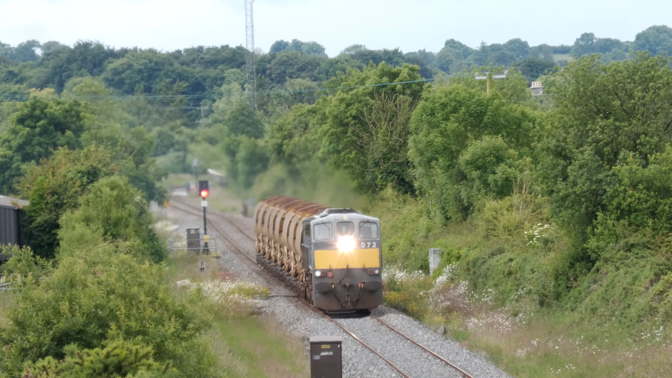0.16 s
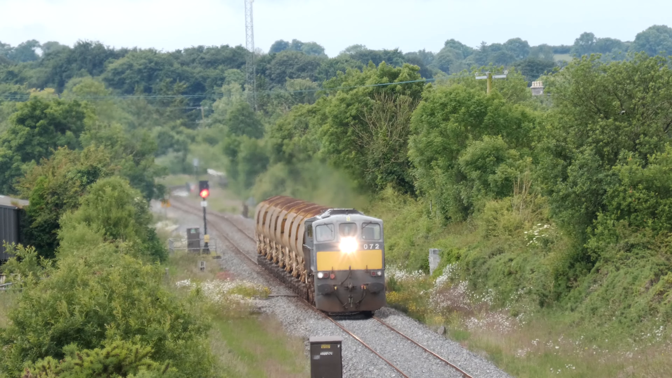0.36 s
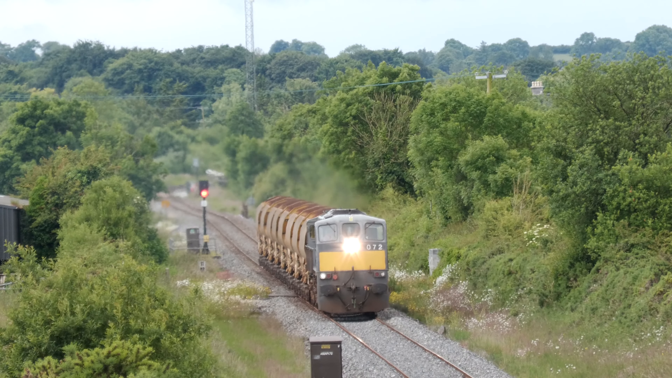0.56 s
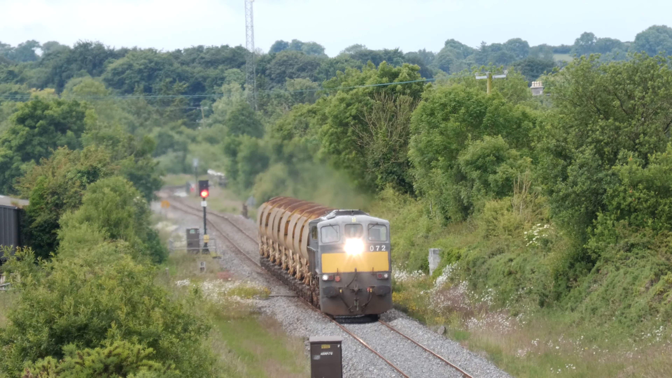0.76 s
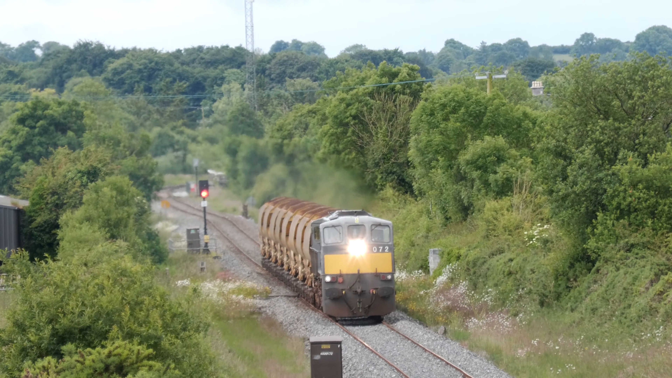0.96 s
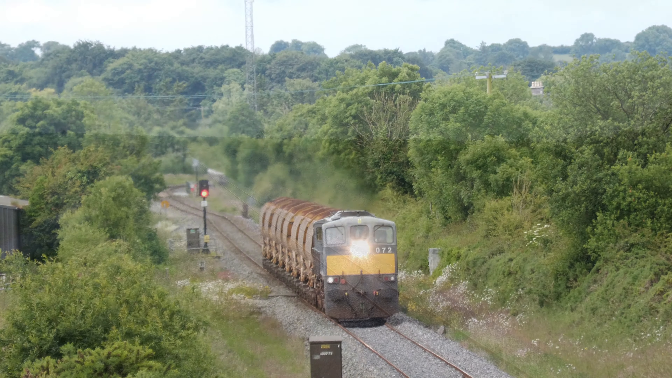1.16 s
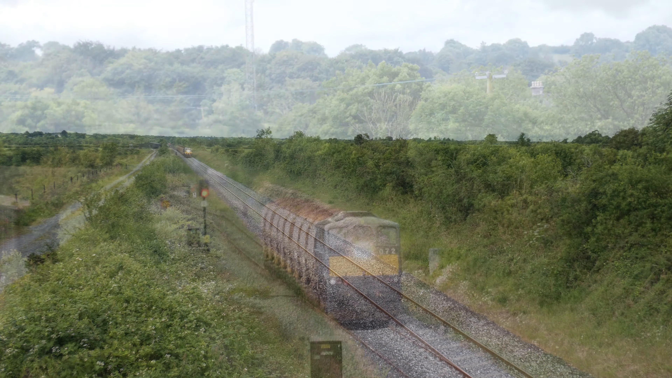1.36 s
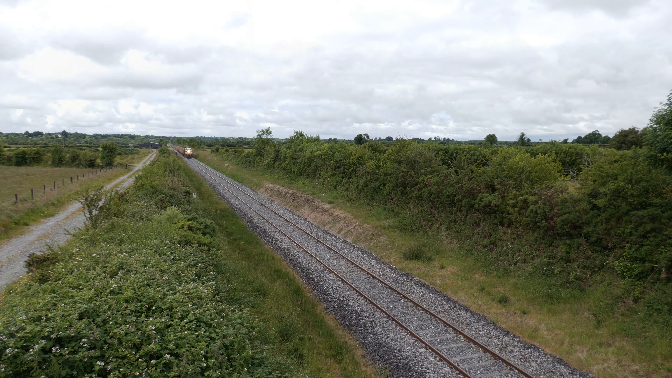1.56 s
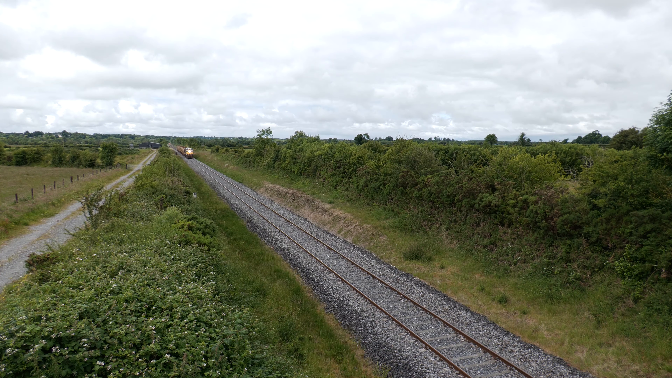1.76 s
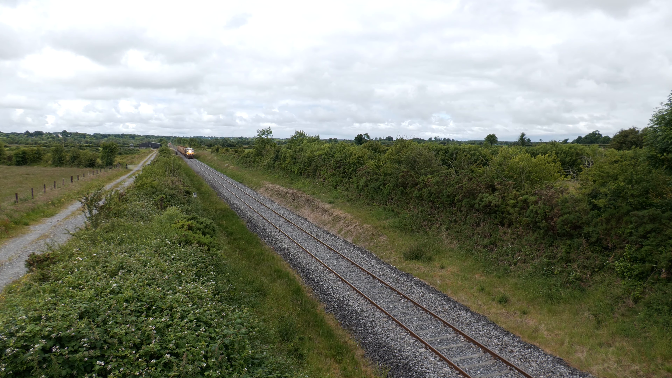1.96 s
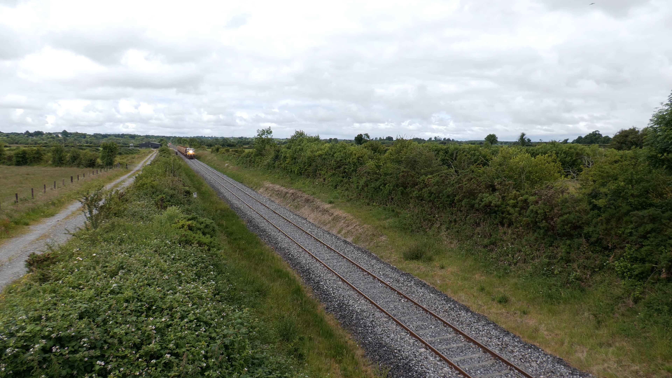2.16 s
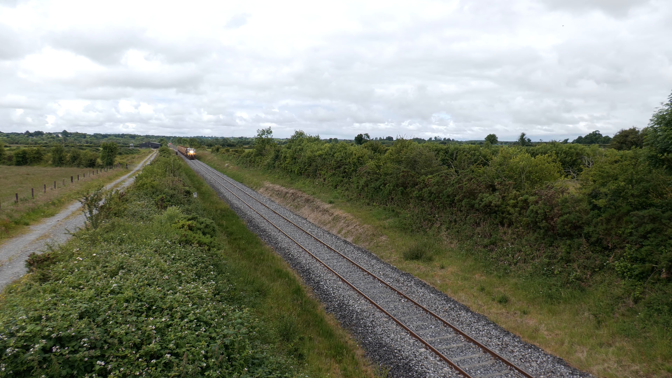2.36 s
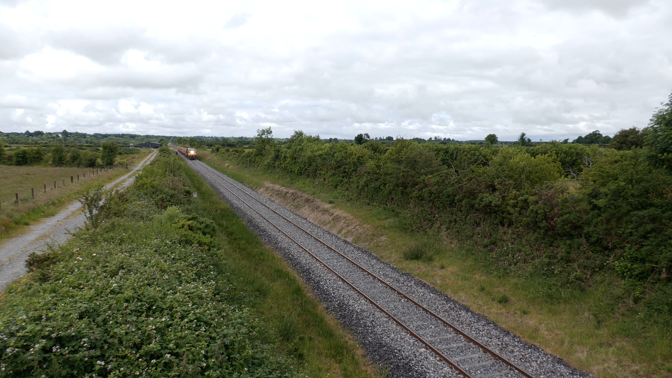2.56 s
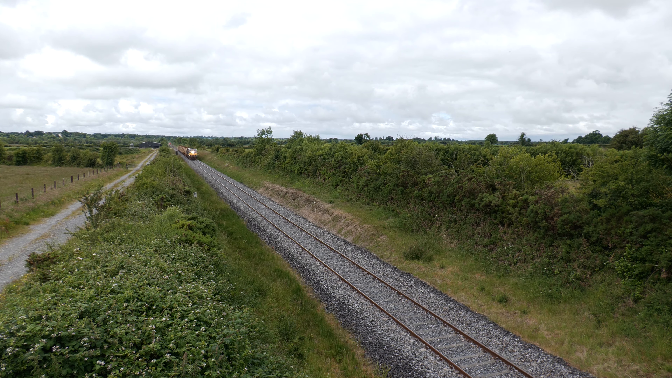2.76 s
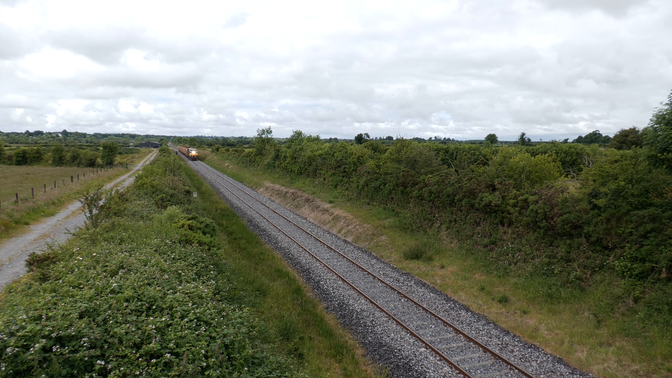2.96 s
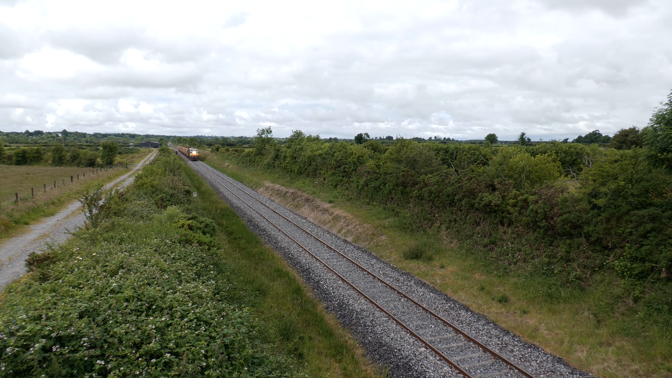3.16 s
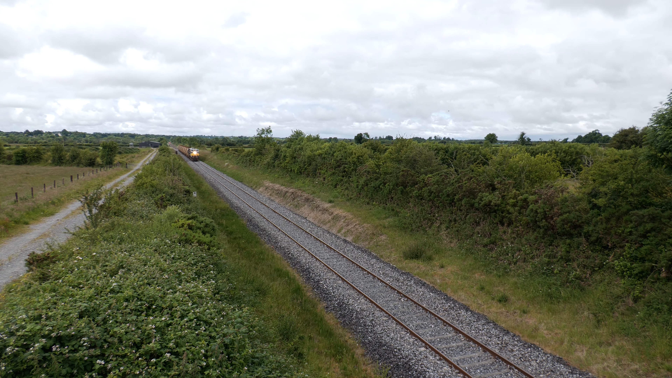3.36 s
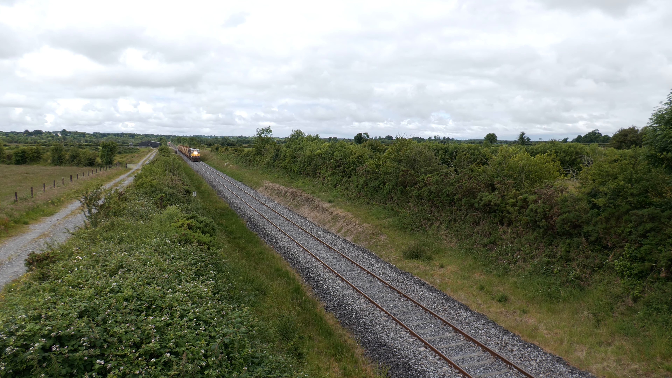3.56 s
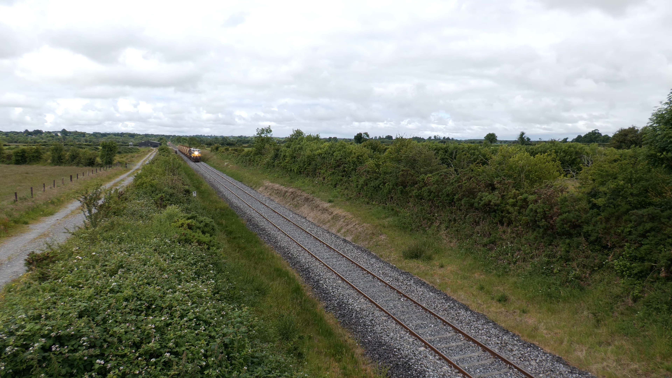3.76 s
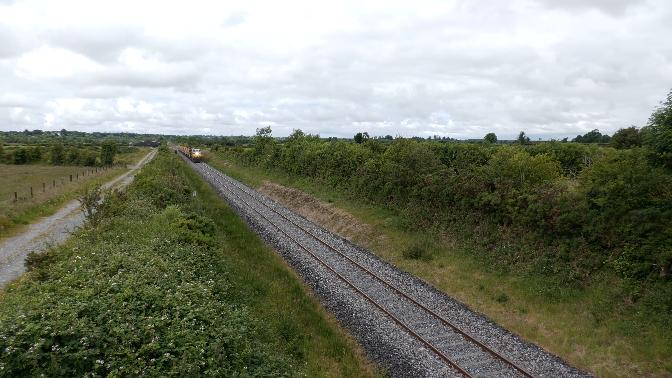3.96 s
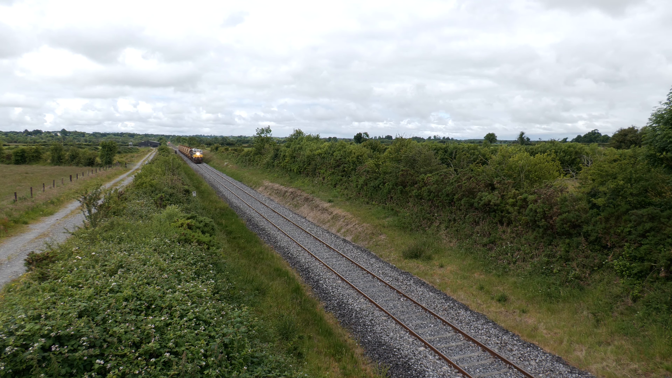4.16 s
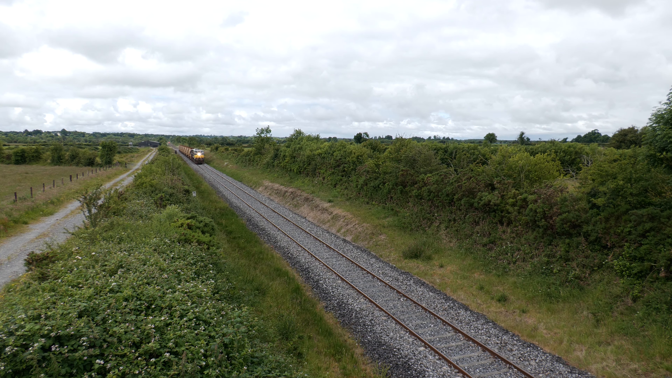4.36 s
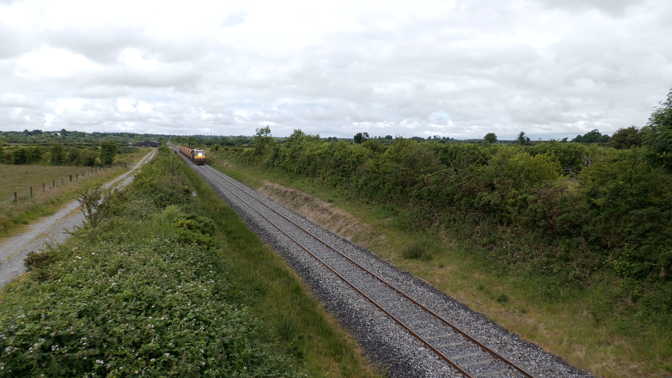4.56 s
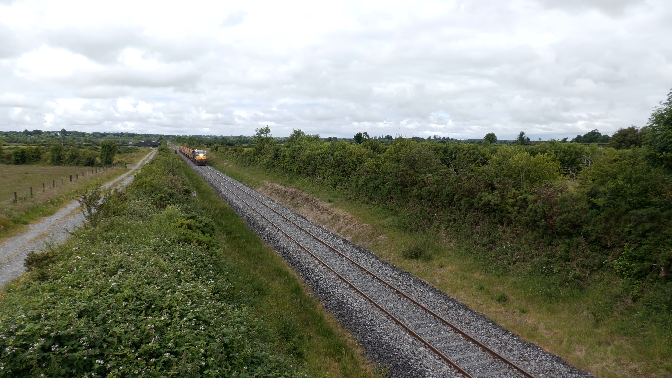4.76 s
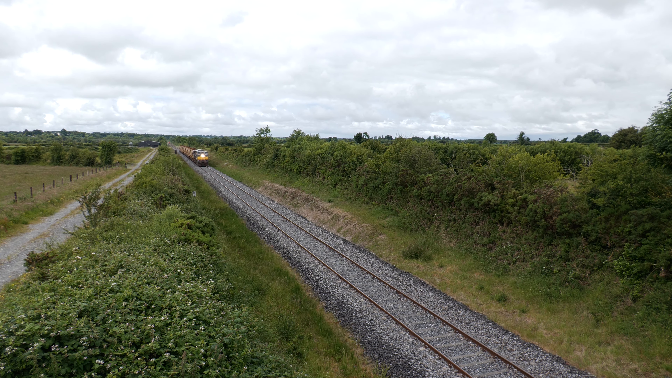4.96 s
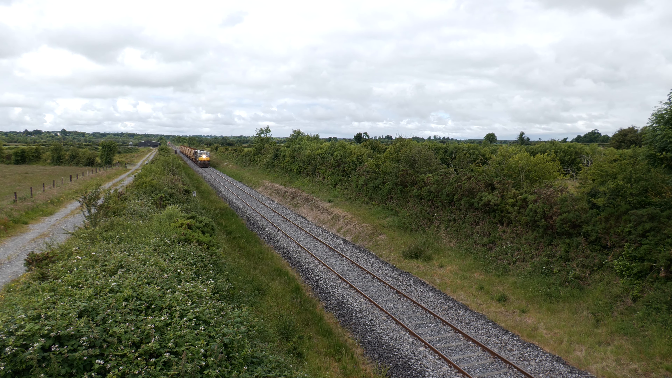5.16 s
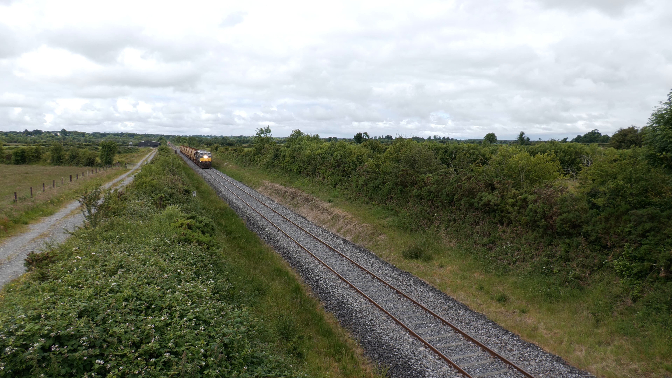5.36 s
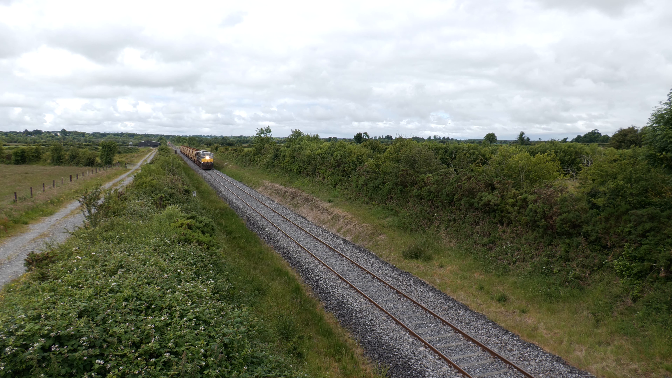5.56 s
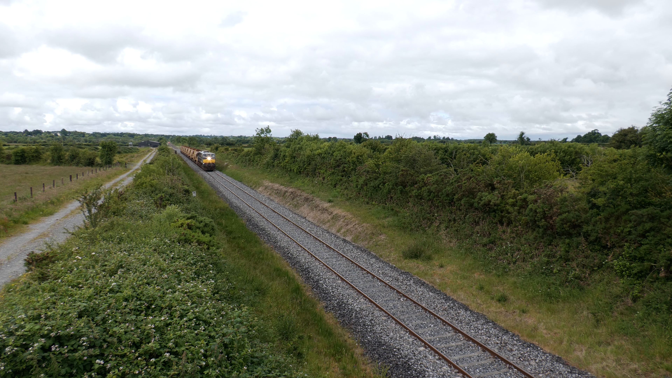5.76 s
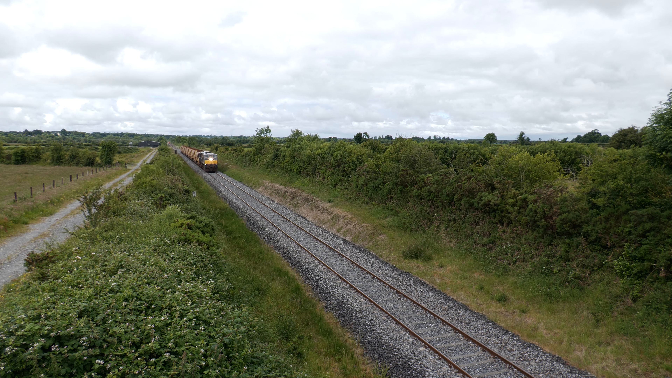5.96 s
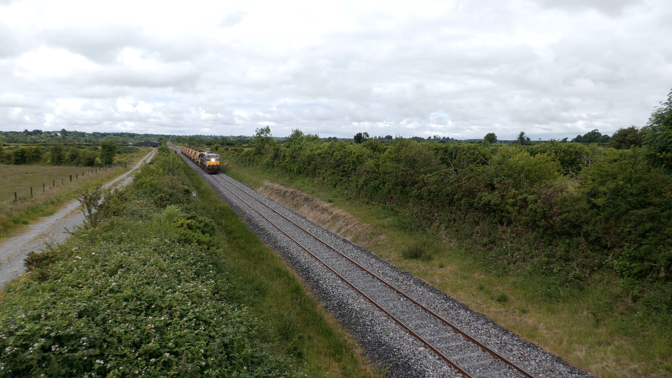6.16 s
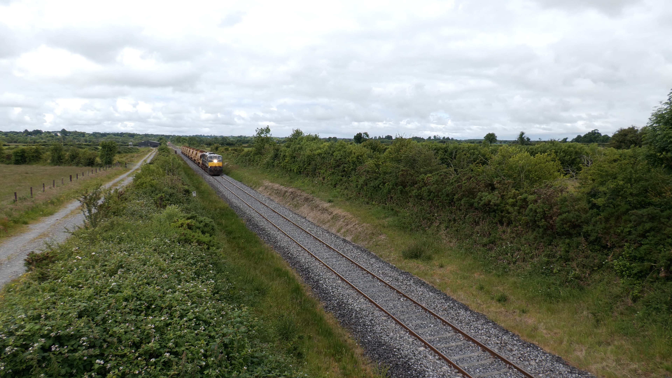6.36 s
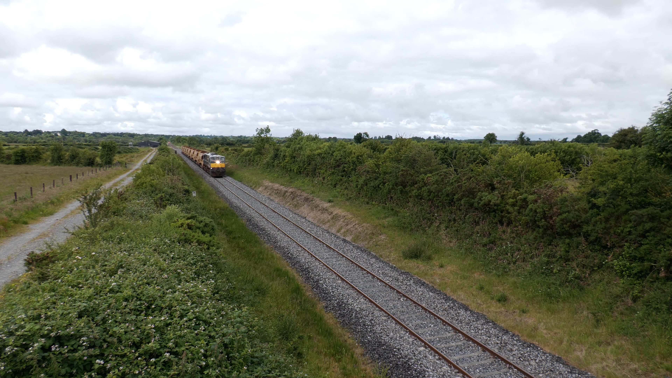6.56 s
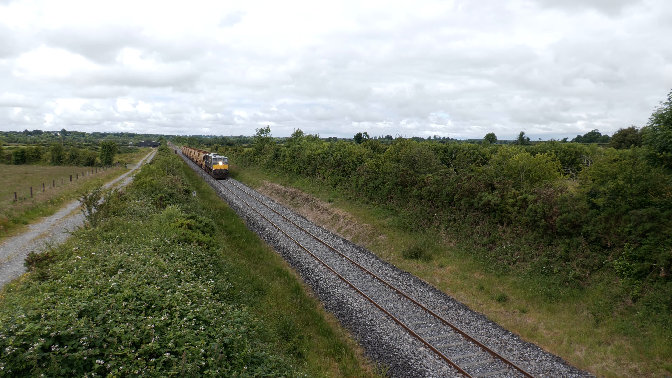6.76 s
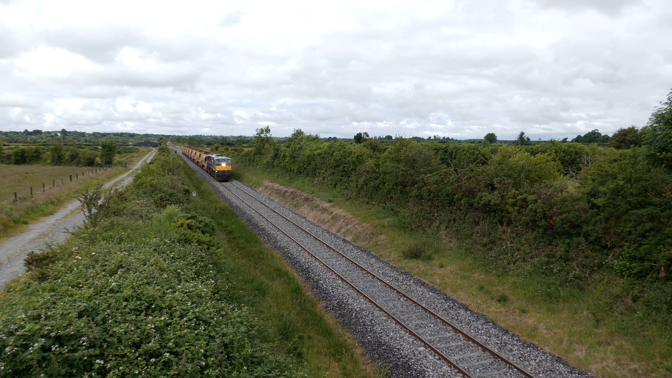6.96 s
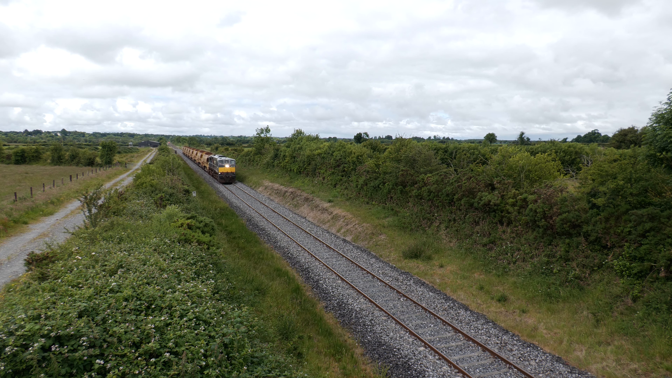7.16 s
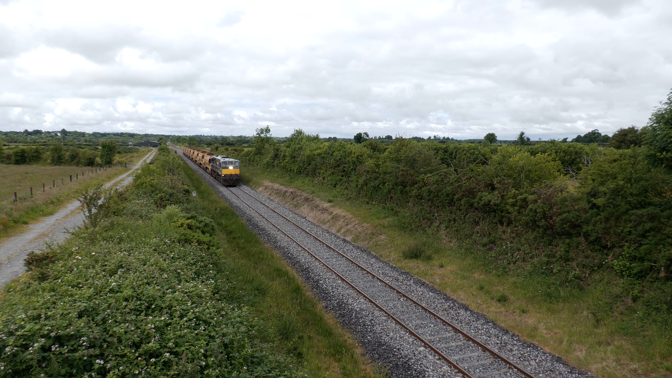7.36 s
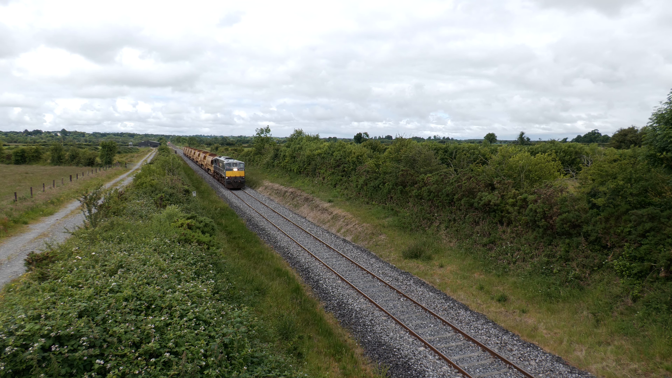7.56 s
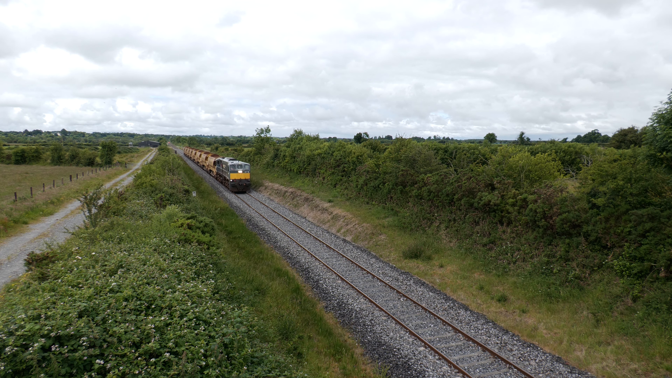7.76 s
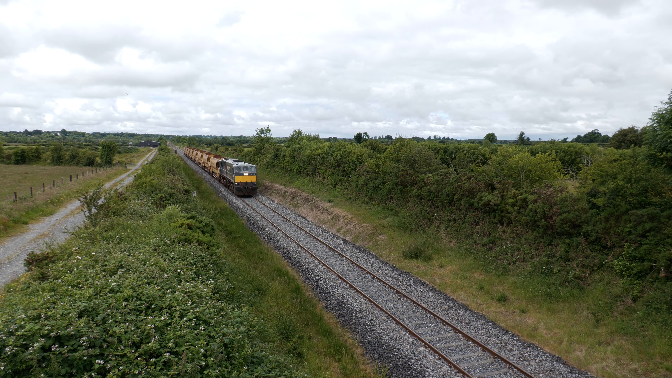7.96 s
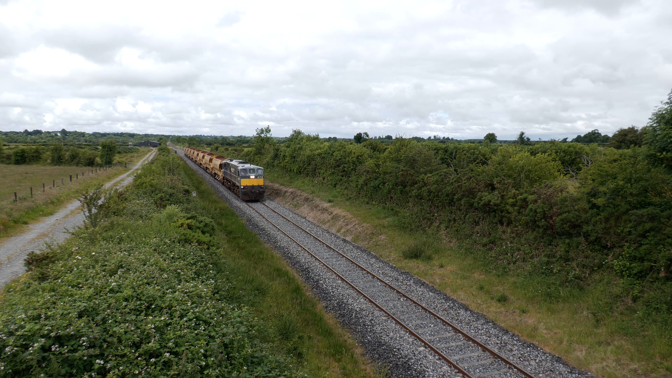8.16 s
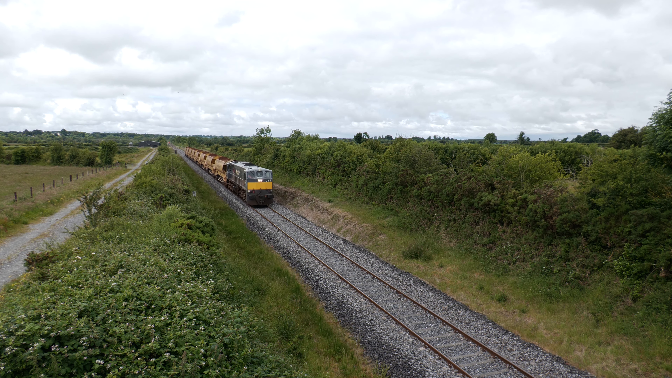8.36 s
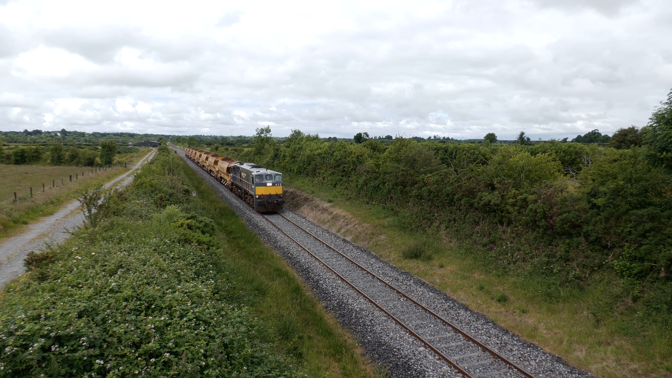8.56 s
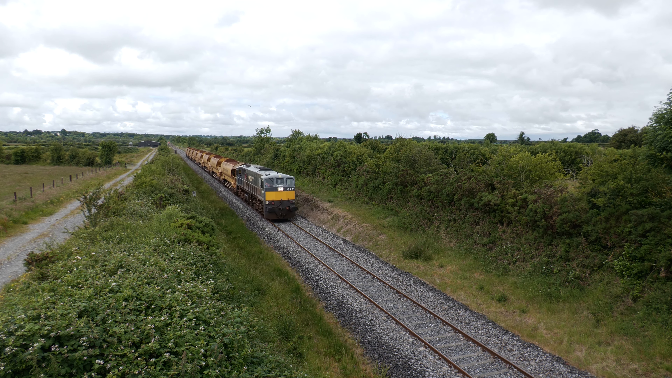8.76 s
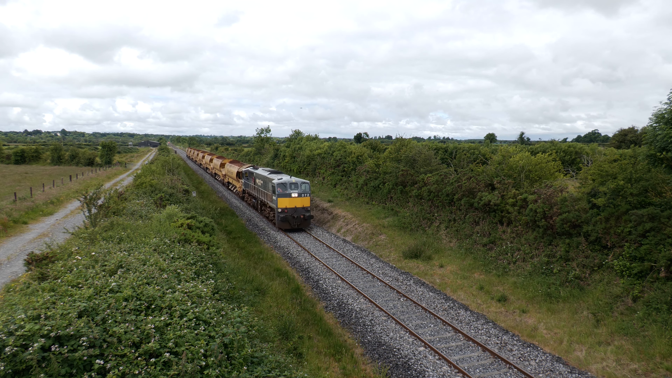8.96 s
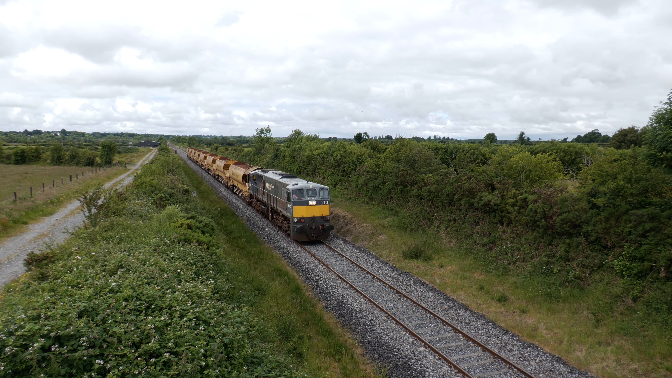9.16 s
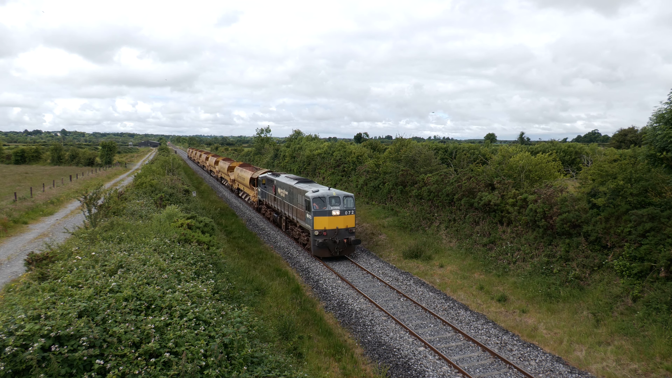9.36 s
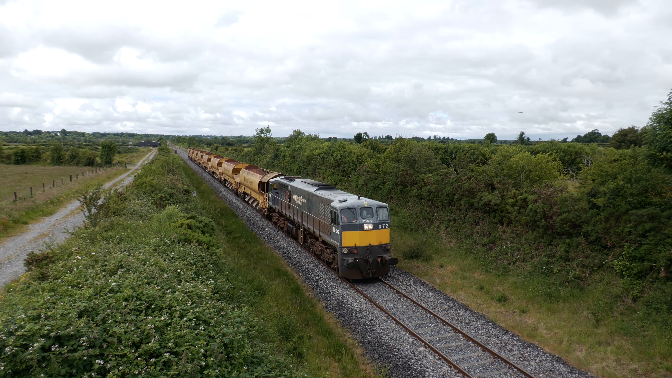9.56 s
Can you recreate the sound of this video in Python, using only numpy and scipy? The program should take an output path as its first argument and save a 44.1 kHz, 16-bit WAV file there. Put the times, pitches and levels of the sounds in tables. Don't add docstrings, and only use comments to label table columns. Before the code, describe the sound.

Throbbing low engine drone of an approaching freight train swells steadily outdoors, joined by rushing wheel noise, gear whine and tiny bird chips.

```python
import sys
import numpy as np
from scipy import signal
from scipy.io import wavfile
from scipy.ndimage import uniform_filter1d, minimum_filter1d

SR = 44100
rng = np.random.default_rng(int(sys.argv[2]) if len(sys.argv) > 2 else 0)


def to_wav(sig):
    pcm = np.clip(np.atleast_2d(sig), -1, 1) * 32767
    pcm = np.round(pcm).astype(np.int16)
    wavfile.write(sys.argv[1], SR, pcm.T)


def gain_from_decibels(decibels):
    exponent = np.asarray(decibels, float) / 20
    return 10 ** exponent


N = 423360

# (time [s], speed [turns/s])
CRANK_SPEED = [(0.0, 16.08), (0.96, 15.961), (1.55, 16.103), (2.2, 15.944), (2.9, 16.075), (3.3, 16.124),
               (3.85, 16.318), (4.2, 16.193), (4.75, 15.924), (5.15, 15.897), (5.5, 15.982), (6.1, 16.277),
               (6.4, 16.281), (7.0, 15.981), (7.8, 16.088), (8.2, 16.058), (8.8, 15.962), (9.6, 15.928)]
# (time [s], level gained [dB])
APPROACH = [(0, -1), (1.25, 2.6), (1.6, 3.5), (2.5, 6.5), (3.5, 9), (4.2, 11), (5.1, 10), (6, 12.5),
            (6.7, 9.5), (7.6, 11.5), (8.4, 10.5), (9.6, 9)]
# (order [per turn], level when far [dB])
LEAD_ORDERS = [(4, -43.5), (6, -38), (7, -41), (8, -37), (9, -29), (10, -33.5), (11, -42.5), (12, -44),
               (13, -53.), (15, -52), (18, -52), (22, -56.5), (25, -58), (32, -56.5)]
# (order [per turn], level over that read between the lead orders [dB])
WEAK_ORDERS = [(3, -10.5), (5, -14.5), (14, -15.), (16, -5), (17, -4), (19, -2), (20, -13), (21, -1),
               (23, 1), (24, -7.5), (26, -3.5), (27, -9), (28, -11.5), (29, -10), (30, -2), (31, -2.9),
               (33, -5.5), (34, -4.5), (35, -3.5), (36, -4.5), (37, -7.), (39, -15)]
# (time [s], order [per turn], length [s], level [dB])
EXHAUST_SWELLS = [(.4, 6, 1.1, -18.5), (.3, 7, 0.55, -24), (.8, 4, 0.3, -6.), (2.1, 25, 1.1, 4),
                  (2.6, 7, .6, 2), (3.5, 11, 0.45, 3), (3.9, 8, 0.44, -7), (4.7, 7, 1.4, -5),
                  (5.2, 13, 0.82, -10.5), (6.2, 11, .4, -2.5), (6.8, 8, .4, 4.5), (7.1, 7, 0.88, 7),
                  (1.7, 22, .3, 4), (3.5, 9, 0.56, -5.5), (4.2, 18, 0.086, 6), (5., 4, 1.3, 2.5),
                  (5.2, 9, 0.36, 5.5), (5.2, 12, 0.63, 0.5), (6.15, 18, 0.068, 2.5), (6.2, 6, .6, -3.5),
                  (6.5, 10, 0.31, -5), (6.9, 15, 0.36, 8.5), (7.5, 12, 0.42, 4.5), (8., 4, .45, 2.5),
                  (8.05, 18, .3, 5.5), (7.9, 32, .25, 4.5), (8.9, 32, 0.35, -7.5), (7.3, 18, 0.26, -3),
                  (8.9, 18, 0.27, 2), (9.5, 6, 0.41, 8)]
GEAR_ORDERS = [54, 72.65, 78.4]
# (level when far [dB], share of the approach [1])
GEAR_LEVELS = [(-61, 1.14), (-67.5, .9), (-74.5, 1.3)]
# (time [s], order [per turn], length [s], level [dB])
GEAR_SWELLS = [(.7, 54, 0.98, -5.5), (4.4, 54, 0.33, -3), (4.1, 54, 0.27, 0), (6.35, 54, .4, 6),
               (28, 54, .5, -0.5), (3.5, 72.65, 0.49, 5.5), (5., 72.65, 0.4, -7), (7.5, 72.65, 1.3, 8.5),
               (19, 72.65, .3, -18), (2.7, 78.4, 0.36, 10), (11, 78.4, 0.28, 11.5), (9.3, 78.4, 0.46, 17.5)]
# (time [s], nearness [0-1])
WHEELS_NEAR = [
    (0, 0.),
    (1.6, 0.02),
    (5.2, 0.23),
    (5.9, 0.53),
    (8, 0.74),
    (8.9, 0.74),
    (9.6, 1),
]
# (band [Hz], level when far [dB], step as the scene changes [dB], climb [dB])
ROAR_BANDS = [(450, -48.5, 10., 6.5), (700, -50, 11.5, 2.5), (1100, -52.5, 6, 11), (1900, -57.5, 4.5, 13),
              (2970, -58.5, 5.5, 12), (5800, -74.5, 6, 12.)]
# (frequency [Hz], level [dB])
ROAR_COLOUR = [(120, -40), (220, -14), (300, -11), (450, -14), (640, -17), (900, -19), (1250, -22),
               (1400, -27), (2000, -28), (2800, -38), (3800, -44), (5500, -51), (8000, -57), (11000, -65),
               (14000, -78)]
# (frequency [Hz], width [Hz], level [dB])
BODY_MODES = [(520, 90, 4.), (720, 60, 3.5), (1640, 160, 5.), (2450, 300, 2.5), (3230, 330, 6.5),
              (4400, 500, 2.5)]
# (time [s], length [s], centre [Hz], level [dB], level in the rails [dB])
RUSHES = [(1.788, 0.083, 2016, 2.5, 5), (2.753, 0.1, 1514, 1, 0), (3.463, 0.1, 2790, 6, 4),
          (3.775, 0.1, 2050, 4.5, -3), (4.1, 0.08, 5600, 1, 3), (4.96, .11, 5520, 6, 0),
          (5.048, 0.064, 2206, 3.5, 3), (5.49, .14, 1900, 4.5, -1), (5.795, .05, 4980, 1.7, 4),
          (5.95, .2, 1100, 4, 3), (.8, 0.12, 2500, 4.5, 0), (4.3, .12, 6000, 1.5, 0),
          (6.107, 0.099, 7500, 7.5, 10.5), (7.408, 0.089, 5020, 2.5, 1), (6.174, 0.051, 2500, 2.5, 0),
          (6.899, 0.46, 750, 2, 0.5), (0.145, 0.08, 750, 3.5, 0), (3.099, 0.11, 2500, -2.5, 0),
          (7.746, 0.14, 5550, 3, 0.5), (8.06, .05, 2200, 2, 5), (8.271, 0.026, 7260, 7.5, 4.),
          (8.6, 0.029, 2500, 4., 7.), (9., 0.061, 3530, 3.5, 0), (9.36, 0.078, 3990, 6.5, 5.)]
# (frequency [Hz], level [dB])
RUMBLE_COLOUR = [(10, -18), (25, -12), (40, -8), (56, 0), (68, -2), (88, -8), (120, -10), (180, -12),
                 (240, -14), (330, -35), (600, -110)]
# (start [s], end [s], level [dB])
GUSTS = [
    (5.002, 6.45, 4.5),
    (8.47, 9.7, -1.5),
]
# (time [s], level [dB], frequency [Hz])
CHIPS = [
    (1.2121, -59, 5010),
    (1.2346, -59, 5180),
    (1.3039, -61, 4610),
    (4.0687, -55, 4710),
    (4.0916, -55, 5170),
    (4.1669, -54, 5250),
    (4.1879, -52, 4910),
]
# (frequency [Hz], width [Hz], level [dB])
RAIL_MODES = [(11500, 1200, -9.), (13000, 1100, -.5), (14300, 1200, -12.)]
# (time [s], gain [dB])
GAIN = [
    (0, .1),
    (5, -.4),
    (7.7, -1.2),
    (8.25, -5.5),
    (8.75, -9),
    (9.25, -12),
    (9.6, -12.5),
]
# (time [s], level [dB])
HISS_DIP = [
    (0, 0),
    (1.1, 0),
    (1.35, -3),
    (1.55, 0),
    (9.6, 0),
]
# (frequency [Hz], level [dB])
HISS_COLOUR = [(1000, -10), (3000, -3.5), (6000, -0.5), (10000, 1), (13000, 2.6), (15700, 2.3)]
# (frequency [Hz], level [dB])
WHISTLE = [(15601, -84), (15649, -87.5)]

ECHO_SHARE, ECHO_TURN, ECHO_FAR_S, ECHO_GROWTH, PASS_S = 0.62, 1.87, 0.00092, 0.0049, 10.67
JOIN_S, JOIN_LENGTH_S, JOIN_DIP_DB, JOIN_TURN = 1.18, 0.35, -3.5, .85
RUSH_OCTAVES = .7
RAILS_END_DB, RAILS_DB_PER_S, RAILS_FROM_S = -61, 5.5, 4
RUMBLE_FAR_DB, RUMBLE_DB_PER_S = -49, 1.82
HISS_DB, OFFSET, EDGE_HZ, CEILING = -66.5, .0153, 15770, .415


def evened(x):
    return x / np.sqrt(np.mean(x ** 2) + 1e-20)


def curve(rows, t):
    s, *columns = np.transpose(rows)
    return np.array([np.interp(t, s, c) for c in columns])


def read(points, hz):
    f, value = np.transpose(points)
    return np.interp(np.log(hz + 1), np.log(f + 1), value)


def bell(x, centre, width):
    return np.exp(-.5 * ((x - centre) / width) ** 2)


def humps(modes, hz):
    return [(db, bell(hz, f, width / 2)) for f, width, db in modes]


def drift(top_hz, count):
    coarse_hz = 40
    coarse = rng.standard_normal((count, int(N / SR * coarse_hz) + 2))
    at = np.arange(coarse.shape[1]) / coarse_hz
    smooth = signal.filtfilt(*signal.butter(2, top_hz, fs=coarse_hz), coarse)
    return np.array([np.interp(np.arange(N) / SR, at, evened(row)) for row in smooth])


def noise(field_db, size, patchy_db, flicker_db):
    hop = size // 4
    t, hz = np.arange(N // hop + 5) * hop / SR, np.fft.rfftfreq(size, 1 / SR)
    a, b, patches = rng.standard_normal((len(t), len(hz), 3)).T
    patches = uniform_filter1d(patches, size=10, axis=0)
    patches = evened(uniform_filter1d(patches, size=12, axis=1))
    flicker = evened(uniform_filter1d(rng.standard_normal(len(t)), size=4))
    level_db = field_db(t, hz) + patchy_db * patches + flicker_db * flicker
    z = (a + 1j * b) * gain_from_decibels(level_db)
    return signal.istft(z, nperseg=size, noverlap=size - hop)[1][:N]


def swells(rows, k, t):
    return sum(db * bell(t, s, length) for s, order, length, db in rows if abs(order / k - 1) < .06)


def ground_db(hz, t):
    lag = ECHO_FAR_S + ECHO_GROWTH / (PASS_S - t)
    return 20 * np.log10(abs(1 + ECHO_SHARE * np.exp(1j * (2 * np.pi * hz * lag + ECHO_TURN))))


def crank():
    return np.cumsum(curve(CRANK_SPEED, np.arange(N) / SR)[0]) / SR + .03


def exhaust(wander_db=3., waver=0.13, flutter_db=1.6):
    t, turns, out = np.arange(N) / SR, crank(), np.zeros(N)
    coarse = t[::256]
    leads = [round(k) for k, db in LEAD_ORDERS]
    join_db = JOIN_DIP_DB * bell(coarse, JOIN_S + JOIN_LENGTH_S / 2, JOIN_LENGTH_S / 4)
    near_db = curve(APPROACH, coarse)[0] + join_db
    lead_db = [db + near_db + swells(EXHAUST_SWELLS, k, coarse) for k, db in LEAD_ORDERS]
    slow, scatter = drift(1.59, count=16), 2 * np.pi * rng.random(size=44)
    fast = drift(5.5, count=11)
    for k, db in [*[(k, 0) for k in leads], *WEAK_ORDERS]:
        k = round(k)
        place = np.interp(k, leads, np.arange(len(leads)))
        below, share = int(place), place % 1
        above = min(below + 1, len(leads) - 1)
        level_db = db + (1 - share) * lead_db[below] + share * lead_db[above]
        level_db = level_db + ground_db(k * curve(CRANK_SPEED, coarse)[0], coarse)
        level_db = np.interp(t, coarse, level_db)
        if k not in leads:
            level_db = level_db + wander_db * np.minimum(slow[k % len(slow)], 1)
            level_db = level_db + flutter_db * np.minimum(fast[k % len(fast)], 1)
        delay = 2.4 * min(k - 9.5, .5)
        delay += scatter[k] if k > 12 or k in (4, 5) else 0
        delay = delay - .75 * (t - 4) * (k == 6)
        delay = delay - JOIN_TURN * (k - 9.7) * np.clip((1.45 - t) / .15, 0, 1)
        loose = waver * min(abs(k - 9.5), 9) * slow[(k + 5) % len(slow)]
        out += gain_from_decibels(level_db) * np.cos(2 * np.pi * k * turns + delay + loose)
    return np.sqrt(2) * out


def gears(waver=1.5, wander_db=3.):
    t, slow, turns = np.arange(N) / SR, drift(3.8, count=6), crank()
    near_db, out = curve(APPROACH, t)[0], np.zeros(N)
    for i, (k, (db, share)) in enumerate(zip(GEAR_ORDERS, GEAR_LEVELS)):
        level_db = db + share * near_db + swells(GEAR_SWELLS, k, t)
        level_db = level_db + wander_db * np.minimum(slow[i + 3], .5)
        out += gain_from_decibels(level_db) * np.sin(2 * np.pi * k * turns + waver * slow[i])
    return np.sqrt(2) * out


def roar(trim_db=-2.0, throb=0.024, echo_share=0.14):
    band_hz, far_db, step_db, climb_db = np.transpose(ROAR_BANDS)[:, :, None]

    def bands_db(t):
        joined = np.clip((t - JOIN_S) / JOIN_LENGTH_S, 0, 1)
        return far_db + step_db * joined + climb_db * curve(WHEELS_NEAR, t)

    def field_db(t, hz):
        change_db = bands_db(t) - bands_db(t).mean(1, keepdims=True)
        place = np.interp(np.log(hz + 1), np.log(band_hz[:, 0]), np.arange(len(band_hz)))
        share = np.maximum(1 - abs(place[:, None] - np.arange(len(band_hz))), 0)
        colour_db = read(ROAR_COLOUR, hz) + sum(db * height for db, height in humps(BODY_MODES, hz))
        rush_db = 0
        for s, length, f, db, rail_db in RUSHES:
            spread = bell(np.log2(hz + 1), np.log2(f), RUSH_OCTAVES)
            rush_db = rush_db + db * np.outer(spread, bell(t, s, length))
        echo_db = echo_share * ground_db(np.minimum(hz, 700)[:, None], np.minimum(t, N / SR))
        echo_db = echo_db * (hz < 700)[:, None]
        return colour_db[:, None] + share @ change_db + rush_db + echo_db

    x = noise(field_db, size=1024, patchy_db=1.36, flicker_db=0.69)
    power = np.mean(gain_from_decibels(2 * bands_db(np.arange(0, N / SR, .05))).sum(0))
    push = 1 + throb * np.cos(2 * np.pi * crank())
    return gain_from_decibels(trim_db) * np.sqrt(power) * evened(x) * push


def rumble(rise_s=0.11):
    t = np.arange(N) / SR
    x = noise(lambda t, hz: read(RUMBLE_COLOUR, hz)[:, None], size=4096, patchy_db=.5, flicker_db=1.)
    gust_db = sum(db * np.clip(np.minimum(t - a, b - t) / rise_s + .5, 0, 1) for a, b, db in GUSTS)
    return gain_from_decibels(RUMBLE_FAR_DB + RUMBLE_DB_PER_S * t + gust_db) * evened(x)


def bird(length_s=.009, sweep_hz=1900, trim_db=-4.):
    out, t = np.zeros(N), np.arange(0, length_s, 1 / SR)
    for s, db, hz in CHIPS:
        glide = hz + sweep_hz * (t / length_s - .5)
        chip = gain_from_decibels(db + trim_db) * np.hanning(len(t)) * np.sin(2 * np.pi * np.cumsum(glide) / SR)
        out[round((s - length_s / 4) * SR):][:len(t)] += chip
    return out


def rails():
    def field_db(t, hz):
        height = sum(gain_from_decibels(db) * height for db, height in humps(RAIL_MODES, hz))
        return 20 * np.log10(height + 1e-6)[:, None]

    t = np.arange(N) / SR
    x = evened(noise(field_db, size=256, patchy_db=.8, flicker_db=.6))
    rush_db = sum(rail_db * bell(t, s, length) for s, length, f, db, rail_db in RUSHES)
    level_db = RAILS_END_DB - RAILS_DB_PER_S * (N / SR - t) + rush_db
    return gain_from_decibels(level_db) * np.clip((t - RAILS_FROM_S) / .3, 0, 1) * x


def limit(x, size=500):
    room = minimum_filter1d(np.minimum(1, CEILING / (abs(x) + 1e-9)), size)
    return x * uniform_filter1d(room, size)


def scene():
    return (exhaust() + gears() + roar() + rumble() + bird() + rails())[None]


def top_cut(x):
    return signal.sosfilt(signal.butter(12, 15900, fs=SR, output="sos"), x)


def record(dry):
    t = np.arange(N) / SR
    gain_db = curve(GAIN, t)[0]
    hiss = noise(lambda t, hz: read(HISS_COLOUR, hz)[:, None], size=512, patchy_db=.3, flicker_db=.2)
    hiss = gain_from_decibels(HISS_DB + curve(HISS_DIP, t)[0] + .5 * gain_db) * evened(hiss)
    whistle = sum(np.sqrt(2) * gain_from_decibels(db) * np.sin(2 * np.pi * hz * t) for hz, db in WHISTLE)
    mix = limit(dry) + hiss + gain_from_decibels(gain_db) * (whistle + OFFSET)
    band_limit = signal.firwin(1023, EDGE_HZ, window=("kaiser", 9), fs=SR)
    mix = signal.oaconvolve(mix, band_limit[None], "same")
    return top_cut(mix)


dry = scene()
out = record(dry)
to_wav(out)
```